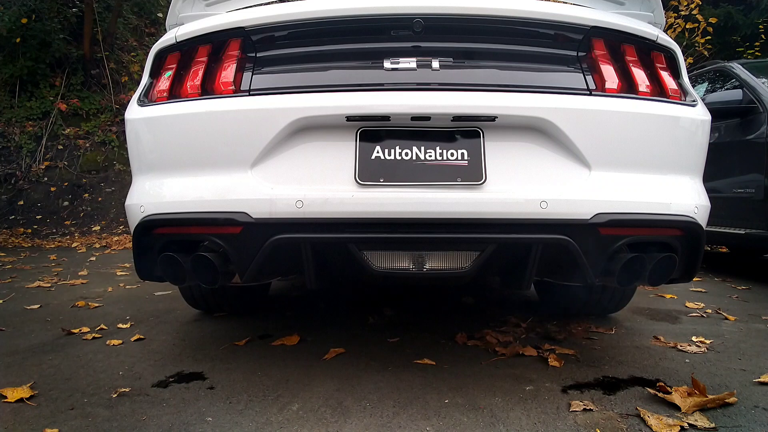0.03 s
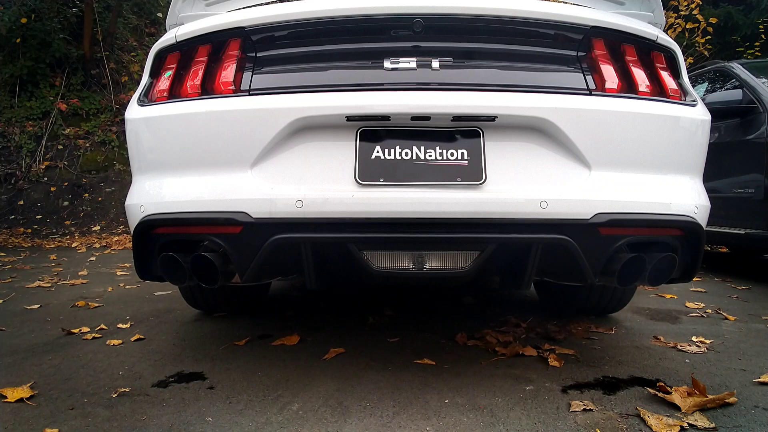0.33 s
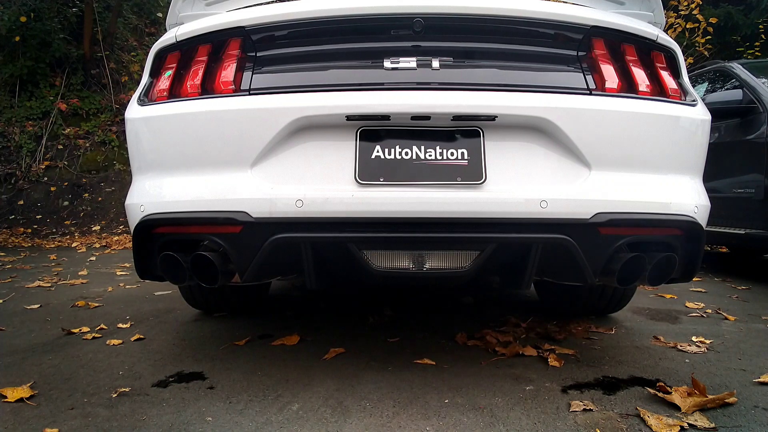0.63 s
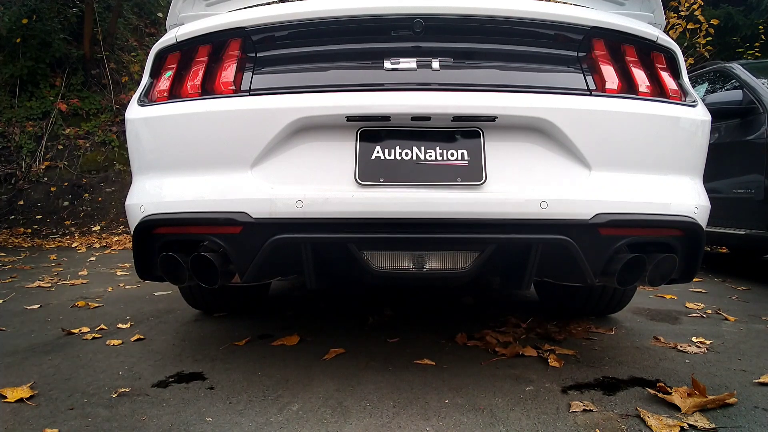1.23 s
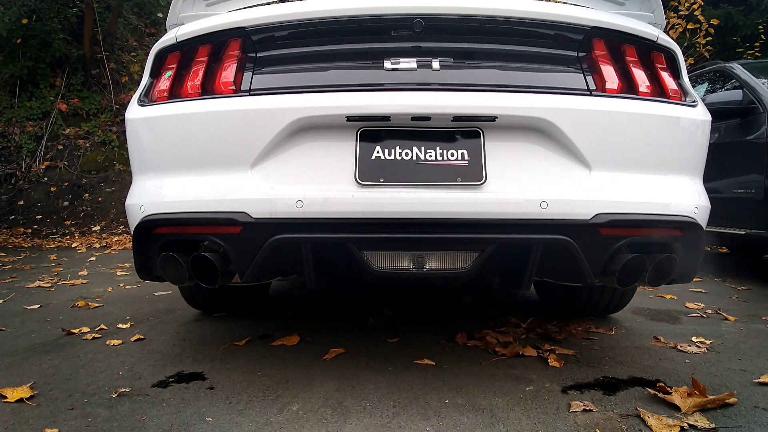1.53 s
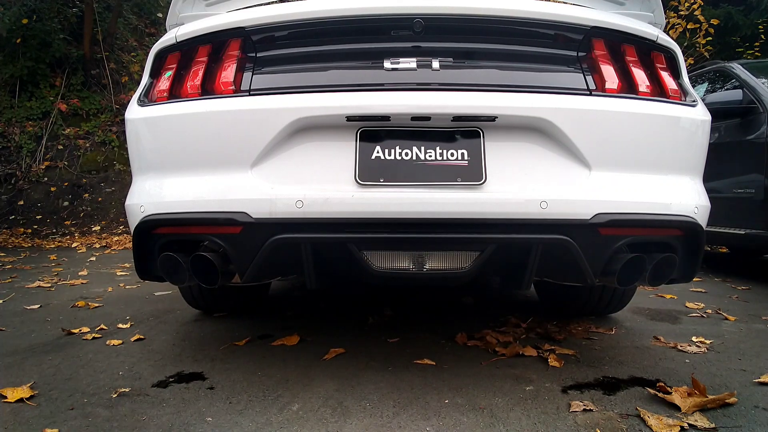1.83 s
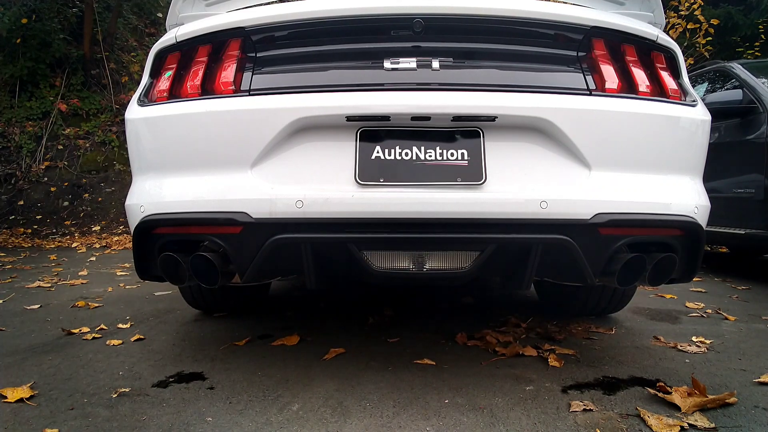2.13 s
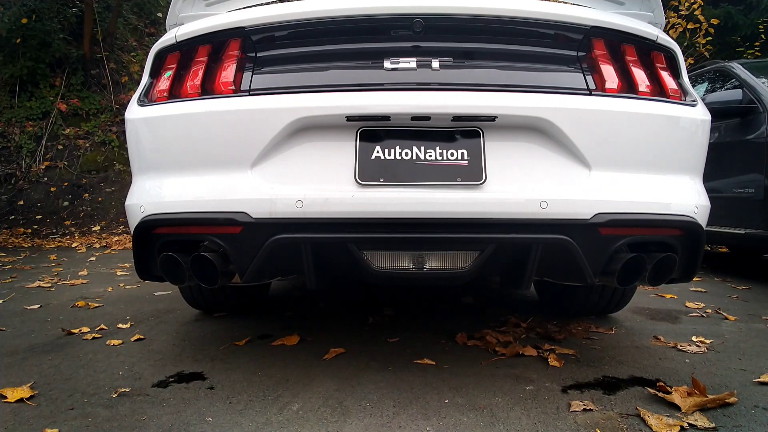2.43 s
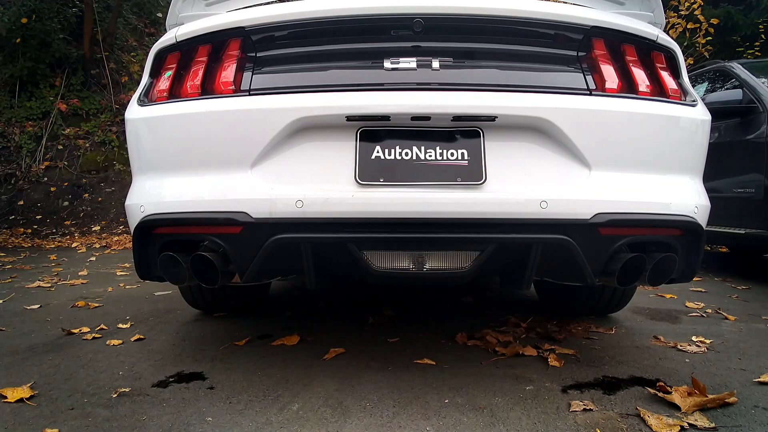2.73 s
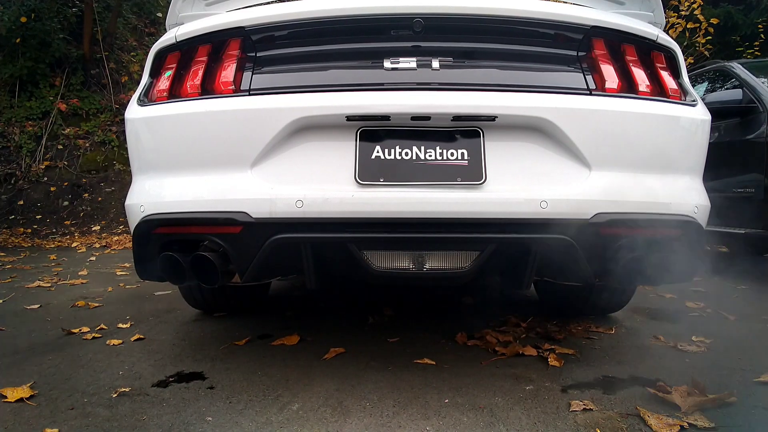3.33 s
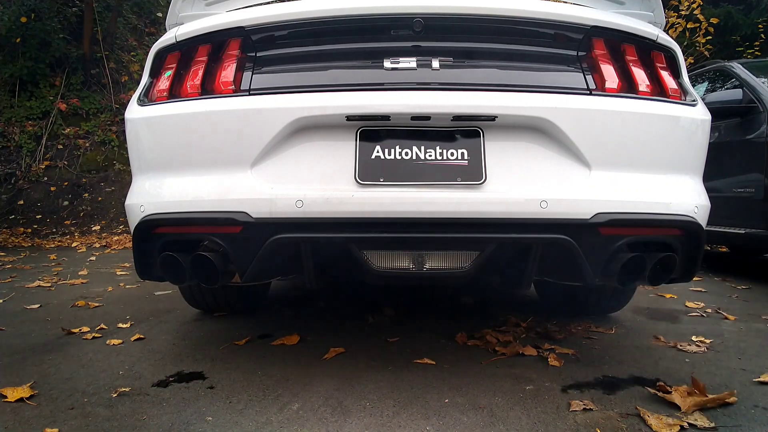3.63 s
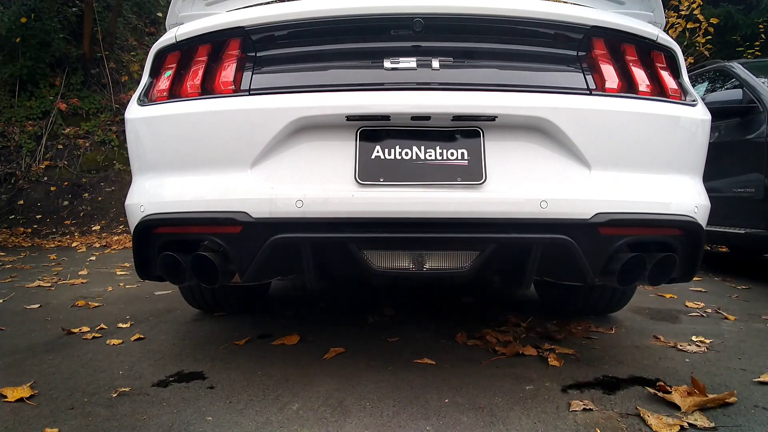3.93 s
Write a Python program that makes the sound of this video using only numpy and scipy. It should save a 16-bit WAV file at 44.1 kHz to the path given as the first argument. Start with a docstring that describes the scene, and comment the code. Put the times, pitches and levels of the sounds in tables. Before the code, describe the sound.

A V8 car engine settles to a deep, loping idle, then revs three times with a bright rasp, the last highest. The exhaust burbles and pops as the revs fall. Heard outdoors, close behind the tailpipes.

```python
"""V8 idle and three blips

A parked car, close behind its twin tailpipes, settles to a loping idle and is blipped three times.
Each firing sends a pulse down the pipes; open throttle evens the pulses and tears them into a bright
rasp, and on the overrun the exhaust burbles and pops. Ground and a nearby bank answer."""
import sys
import numpy as np
from scipy import signal
from scipy.fft import rfft, irfft, next_fast_len
from scipy.io import wavfile
from scipy.ndimage import uniform_filter1d

SR = 44100
rng = np.random.default_rng(int(sys.argv[2]) if len(sys.argv) > 2 else 0)


def wrap_up_sound(samples):
    """Save the sound to the file named by the first command line argument, as 16-bit audio."""
    columns = np.atleast_2d(samples).T
    # keep every value between -1 and 1, then stretch to whole-number steps
    tamed = np.clip(columns, -1, 1)
    steps = np.round(tamed * 32767).astype(np.int16)
    wavfile.write(sys.argv[1], SR, steps)


N = 176400
TIME = np.arange(N) / SR
FFT_SIZE = next_fast_len(N + SR // 2)


def amp(db):
    return 10 ** (np.asarray(db) / 20)


def unit(x):
    return x / np.sqrt(np.mean(x ** 2) + 1e-20)


def curves(rows, at):
    """Read each later column at the given values of the first."""
    knots, *cols = np.transpose(rows)
    return [np.interp(at, knots, col) for col in cols]


def eq_gain(points, size):
    hz, db = np.transpose(points)
    return amp(np.interp(np.log(np.fft.rfftfreq(size, 1 / SR) + 1), np.log(hz), db))


def eq(x, points, size=8192):
    """Minimum-phase EQ: nothing rings ahead of an attack."""
    cepstrum = irfft(np.log(eq_gain(points, size)))
    cepstrum[1:size // 2] *= 2
    cepstrum[size // 2 + 1:] = 0
    impulse = irfft(np.exp(rfft(cepstrum)))
    return signal.fftconvolve(np.atleast_2d(x), impulse[None], axes=1)[:, :N]


def crest_eq(x, points):
    """Zero-phase EQ: each pulse keeps its sharp crest."""
    return irfft(rfft(x, FFT_SIZE) * eq_gain(points, FFT_SIZE), FFT_SIZE)[:, :N]


def steady(x, size=3600):
    """Ride the gain to hold rms 1 over about an engine cycle."""
    power = uniform_filter1d(uniform_filter1d(np.mean(x ** 2, axis=0), size), size)
    return x / np.sqrt(np.abs(power) + 1e-14)


def noise(alike):
    """Stereo white noise with the given left-right correlation."""
    angle = np.arccos(alike) / 2
    mid, side = rng.standard_normal((2, N)) * [[np.cos(angle)], [np.sin(angle)]]
    return np.array([mid + side, mid - side])


def pan(left_db):
    return amp([[left_db], [-left_db]])


def spikes(times, sizes):
    """Impulses placed between samples."""
    at = np.clip(times * SR, 0, N - 2)
    i = at.astype(int)
    return np.bincount(i, sizes * (1 - at + i), N) + np.bincount(i + 1, sizes * (at - i), N)


def decay(x, life_s):
    """Give every impulse an exponential tail."""
    return signal.lfilter([1], [1, -np.exp(-1 / (life_s * SR))], x)


def rumble():
    """A faint, low bed of outdoor air."""
    tone = [(20, -9.5), (60, -9), (200, -0.5), (2000, -29), (15000, -60.5)]  # f/Hz, gain/dB
    return amp(-40.5) * unit(eq(noise(alike=0.77), tone))


# Tone of the reflections, thin in the bass: f/Hz, gain/dB
ECHO_EQ = [(100, -51), (300, -6.5), (600, 9.5), (15000, 4)]

def reflections(car, t60_s=0.2):
    """Short, scattered returns from the ground, the car and the bank."""
    t = TIME[:SR // 3]
    tail = rng.standard_normal((2, len(t))) * amp(-60 * t / t60_s)
    tail /= np.linalg.norm(tail, axis=1, keepdims=True)
    return amp(-12) * eq(signal.fftconvolve(car, tail, axes=1)[:, :N], ECHO_EQ)


def cut_click(at_s=0.921):
    """A dry click at a hard cut, where the sound jumps to a slower idle."""
    envelope = decay(spikes(np.array([at_s]), amp([-20])), life_s=0.0036)
    return envelope * unit(eq(noise(alike=0.63), [(600, -5.5), (15000, -36.5)]))


# Pop cues: t/s, level/dB
POP_CUES = [(1.812, -43.5), (1.857, -9.5), (1.867, -28.5), (1.984, -22), (2.047, -21.5), (2.1583, -7.5),
            (2.164, -24.5), (2.176, -19.5), (2.861, -9), (2.952, -33.5), (3.062, -15), (3.069, -9.5),
            (3.377, -13.5), (3.44, -16), (3.461, -17.5), (3.481, -14), (3.918, -15.5)]
# A pop's bright burst and dull thud: f/Hz, gain/dB
BURST_EQ = [(200, -13), (600, -20), (900, -20.5), (1300, 6.5), (2600, -7.5), (4200, 1.5), (7000, -4),
            (15000, -19.5)]
THUD_EQ = [(60, -21), (180, -8.5), (600, -6), (800, -11), (3000, -34)]

def pops():
    """Unburnt fuel goes off in the pipes: a thud and a burst of noise."""
    times, db = np.transpose(POP_CUES)
    bangs = spikes(times, amp(db))
    burst = decay(bangs, life_s=0.0052) * unit(eq(noise(alike=0.092), BURST_EQ))
    thud = eq(bangs, THUD_EQ)
    return burst + amp(db.max() - 1) * thud / np.abs(thud).max()


# Throttle blips: open t/s, shut t/s, rise/s, blast level/dB
THROTTLE_BLIPS = [(1.366, 1.697, 0.2, -21.5), (2.671, 2.834, 0.1, -20.5), (3.054, 3.334, 0.0033, -22)]

def blast_envelope(swell_power=1.37, fall_db_per_s=237):
    """Each blip's blast of gas swells while the throttle is open and collapses when it shuts."""
    blast = np.zeros(N)
    for start, shut, rise, db in THROTTLE_BLIPS:
        swell = np.clip((TIME - start) / rise, 0, 1) ** swell_power
        blast += swell * amp(db - fall_db_per_s * np.maximum(TIME - shut, 0))
    return blast


# Rev curve: t/s, firing rate f/Hz
REVS = [(0, 138), (.116, 136.6), (.414, 121), (.72, 112), (.915, 107.9), (.93, 90.37), (1.15, 87),
        (1.37, 90.57), (1.5, 132.8), (1.64, 203.4), (1.73, 221.3), (1.92, 216.4), (2.08, 197.4),
        (2.3, 170.4), (2.6, 147.4), (2.68, 147.3), (2.86, 210), (2.95, 210), (3.06, 203.1), (3.25, 285.2),
        (3.4, 317.4), (3.52, 301.9), (3.73, 276.2), (4, 245.6)]
# The lope, cylinder by cylinder in firing order: pulse accent/dB, rasp accent/dB
ACCENTS = [(-7, 3.5), (-4.5, -4), (1, -7), (-3, 19), (-7, 21), (-1.5, -12.5), (-3, 14), (-4, 11.5)]
# Cylinder bank of each firing: 0 early, 1 late
CYLINDER_BANK = [0, 1, 0, 0, 1, 0, 1, 1]

def firings(idle_hz=121, top_hz=326.4, throttle_travel_s=0.062, bank_lag_s=0.001998):
    """Pressure pulses and gas puffs of eight cylinders, in two banks of unequal path."""
    count = np.cumsum(curves(REVS, TIME)[0]) / SR
    count -= np.interp(0.481, TIME, count)  # the first cylinder is due at this time
    firing = np.arange(np.ceil(count[0]), count[-1]).astype(int)
    times = np.interp(firing, count, TIME)
    hz, = curves(REVS, times)
    fast = np.clip((hz - idle_hz) / (top_hz - idle_hz), 0, 1)
    throttle = sum(np.clip(np.minimum(times - start, shut - times) / throttle_travel_s + 0.5, 0, 1)
                   for start, shut, _, _ in THROTTLE_BLIPS)
    accent_db, rasp_db, bank = np.column_stack([ACCENTS, CYLINDER_BANK])[firing % 8].T
    pulse_dice, time_dice, puff_dice = rng.standard_normal((len(firing), 3)).T
    lope = 1 - 0.7 * throttle * (1 - fast ** 2)  # throttle evens the beat, less so at high revs
    jitter_s = 0.00008 + 0.00037 * fast
    times = times + lope * bank * bank_lag_s * (1 + fast) / 2 + jitter_s * time_dice
    scatter_db = 2 + 1.63 * fast * (1 - throttle)  # extra burble on the overrun
    pulse_db = lope * (1 - fast / 2) * accent_db + scatter_db * pulse_dice
    spit_db = 9 * np.sqrt(fast) * (firing % 4 == 1)  # lifts one puff per crank turn
    load_db = (1 + fast) / 2 * rasp_db + spit_db
    puff_db = (1.5 - throttle) * accent_db + throttle * load_db + 2 * puff_dice
    return spikes(times, amp(pulse_db)), spikes(times, amp(puff_db))


# Gas noise off throttle: firing rate f/Hz, rasp level/dB, fizz level/dB
COASTING_LEVELS = [(87, -48, -69.5), (112, -44.5, -62.5), (142, -37, -58), (139.6, -39.5, -60),
                   (183.4, -35, -41), (210, -33, -38.5), (234, -31.5, -34), (295, -28, -33)]
# Midrange rasp and top-end fizz: f/Hz, gain/dB
RASP_EQ = [(300, -36), (700, -10.5), (950, -11), (1260, 0), (1550, -8), (1800, -4.5), (2300, -15.5),
           (2800, -18), (4500, -55.5)]
FIZZ_EQ = [(1500, -47), (2700, -11.5), (3200, -3), (3650, -6.5), (4100, -9.5), (4950, -6.5), (5800, -4),
           (7500, -7.5), (9500, -14), (13000, -18.5), (16000, -20.5)]

def tips(pulses, jet, blast, ring_hz=4110):
    """Each pulse leaves with a crack and a puff of torn gas; the steel tips add a metallic ring."""
    rasp_db, fizz_db = curves(COASTING_LEVELS, curves(REVS, TIME)[0])
    crack = amp(-7) * steady(eq(pulses, RASP_EQ))
    tear = amp(1) * steady(eq(jet * noise(alike=0.56), RASP_EQ))
    rasp = np.hypot(amp(rasp_db), amp(-3) * blast) * (crack + tear)
    hiss = eq(jet * noise(alike=0.092), FIZZ_EQ)
    ring = 2.6 * signal.lfilter(*signal.iirpeak(ring_hz, Q=14, fs=SR), hiss)
    fizz = amp(3) * np.hypot(amp(fizz_db), blast) * steady(hiss + ring)
    return rasp * pan(1.35) + fizz * pan(0.54)


# Fader rides for the pipes: t/s, boom level/dB, bark level/dB, blare level/dB
PIPE_FADERS = [(0.0, -17.5, -31, -29), (0.11, -16, -23, -36), (0.8, -16.5, -22.5, -31),
               (1.31, -20, -30.5, -41.5), (1.44, -12, -21.5, -22), (1.53, -13.5, -17.5, -17.5),
               (1.67, -26.5, -25, -21.5), (1.83, -21, -23.5, -29), (1.86, -13.5, -17.5, -18),
               (1.9, -14.5, -21, -27), (2.06, -17, -18.5, -24.5), (2.21, -22, -21.5, -23),
               (2.29, -17, -22, -28.5), (2.65, -17, -26.5, -32.5), (2.71, -12.5, -17.5, -15),
               (2.88, -27.5, -26, -22), (3.03, -16, -23, -26.5), (3.09, -28.5, -24.5, -20.5),
               (3.39, -31.5, -25, -25), (3.48, -21, -15, -23.5), (3.62, -19.5, -16.5, -22.5),
               (3.76, -18.5, -13.5, -22), (3.97, -16, -17.5, -18.5), (4.0, -18, -21.5, -27)]
# Deep boom, throaty bark and the blare above them: f/Hz, gain/dB
BOOM_EQ = [(25, -52), (50, -9.5), (80, -10.5), (112, -0.5), (160, 4.5), (215, -1.5), (255, -13), (340, -31),
           (700, -79.5)]
BARK_EQ = [(120, -59), (245, -6), (315, 3.5), (385, 2), (440, -16.5), (600, -37), (2500, -71)]
BLARE_EQ = [(150, -61), (370, -7.5), (470, 1), (610, -2), (690, -19), (1000, -28.5), (2500, -59.5),
            (6000, -100)]

def pipes(pulses, jet, blast):
    """Pulses and turbulence resonate in the pipes as boom, bark and blare."""
    boom_db, bark_db, blare_db = curves(PIPE_FADERS, TIME)
    flow = unit(pulses) + amp(-5.5) * unit(jet * noise(alike=1))
    boom = amp(boom_db + 0.5) * steady(crest_eq(flow, BOOM_EQ))
    bark = amp(bark_db - 1) * steady(crest_eq(flow, BARK_EQ))
    churn_db = 5 - 14.5 * blast / blast.max()  # the blare is turbulent until the throttle opens
    blare_flow = unit(pulses) + amp(churn_db) * unit(jet * noise(alike=1))
    blare = amp(blare_db) * steady(crest_eq(blare_flow, BLARE_EQ))
    return boom + (bark + blare) * pan(-0.9)


def exhaust(puff_life_s=0.0017, puff_rise_s=0.00034):
    """The firings drive the pipes and their tips."""
    pulses, puffs = firings()
    jet = unit(decay(decay(puffs, puff_life_s), puff_rise_s)) + 0.84  # puffs ride on a steady stream
    blast = blast_envelope()
    return pipes(pulses, jet, blast) + tips(pulses, jet, blast)


def scene():
    """The car and its reflections over a low outdoor bed."""
    car = exhaust() + pops()
    return car + reflections(car) + cut_click() + rumble()


def record(dry, cut_hz=16000):
    """Hard clip at full scale, then a brick-wall high cut."""
    passband = np.fft.rfftfreq(FFT_SIZE, 1 / SR) < cut_hz
    return irfft(rfft(np.clip(dry, -1, 1), FFT_SIZE) * passband, FFT_SIZE)[:, :N]


dry = scene()
out = record(dry)
wrap_up_sound(out)
```